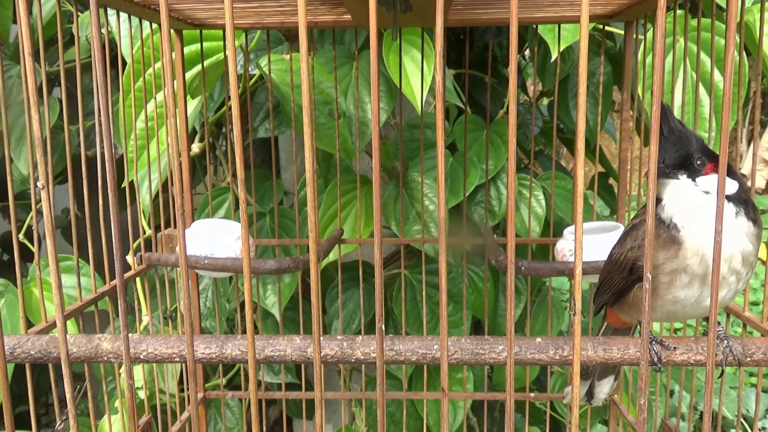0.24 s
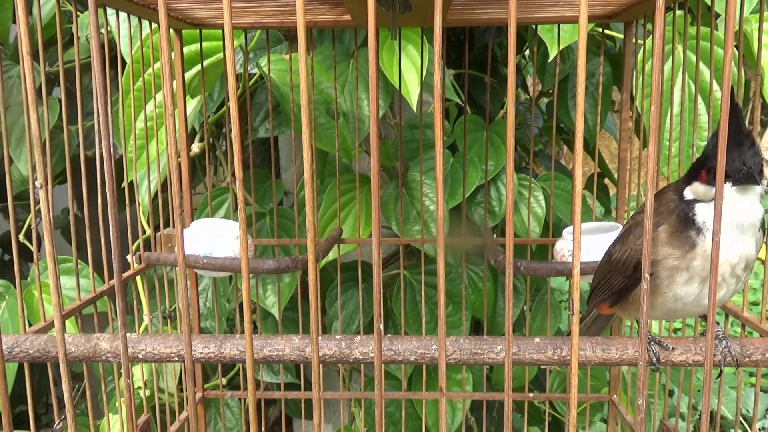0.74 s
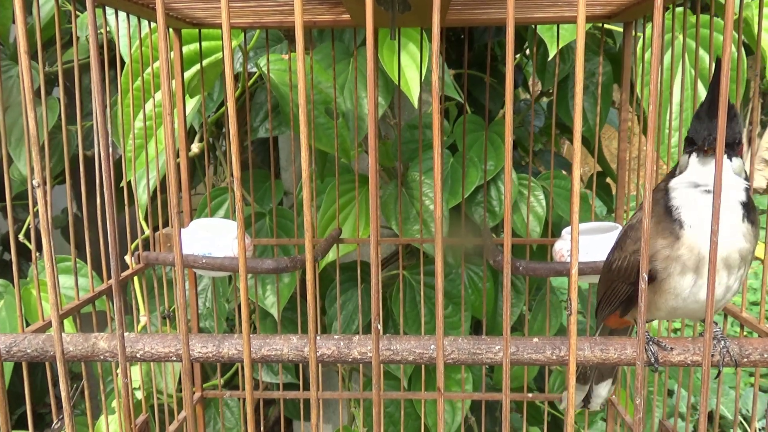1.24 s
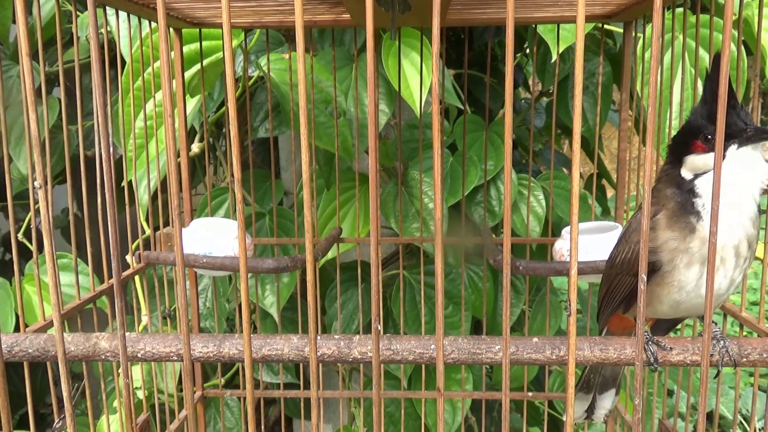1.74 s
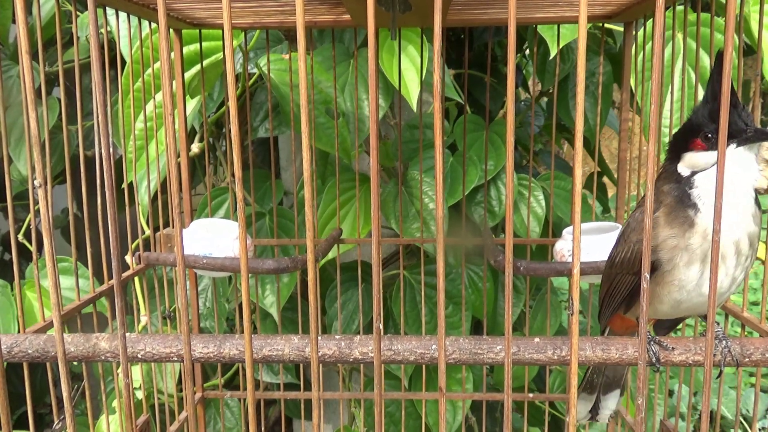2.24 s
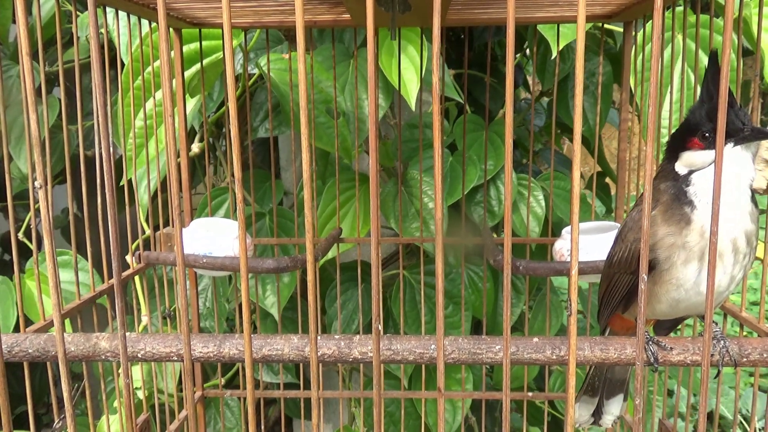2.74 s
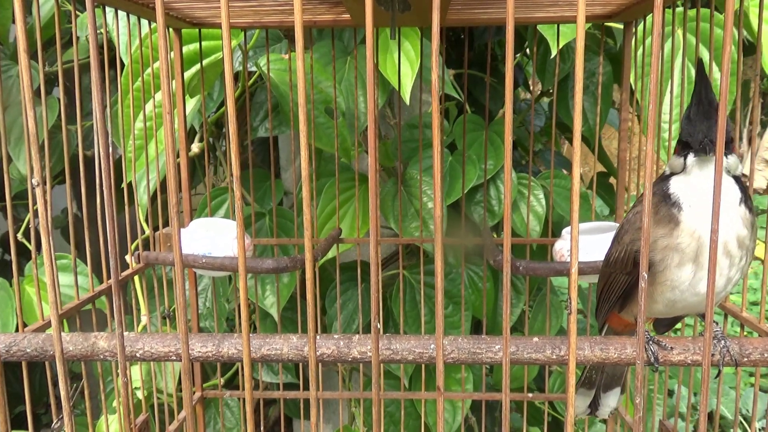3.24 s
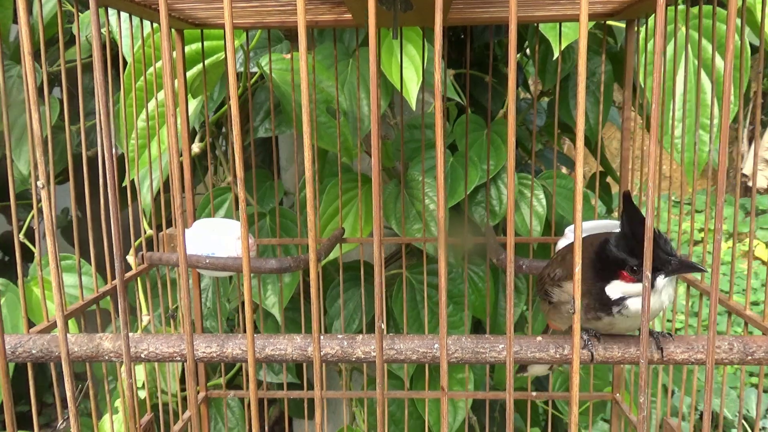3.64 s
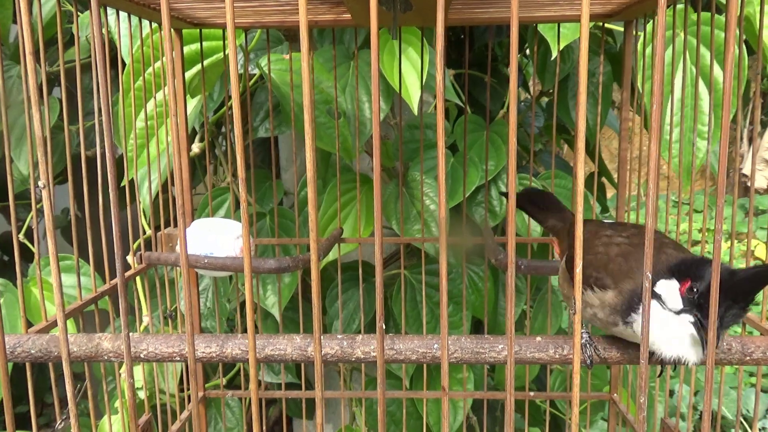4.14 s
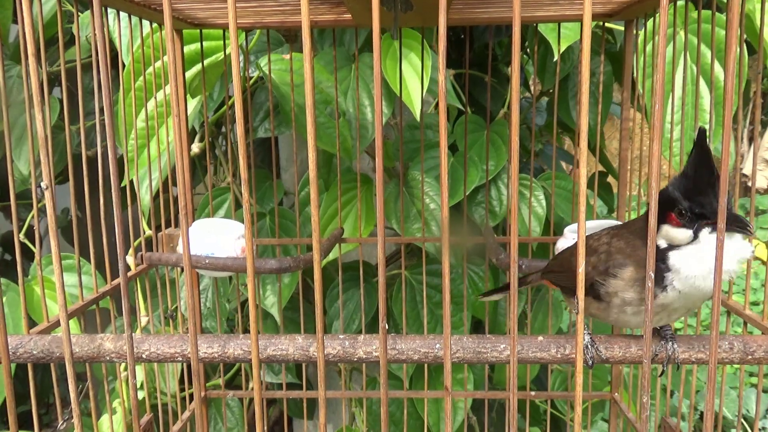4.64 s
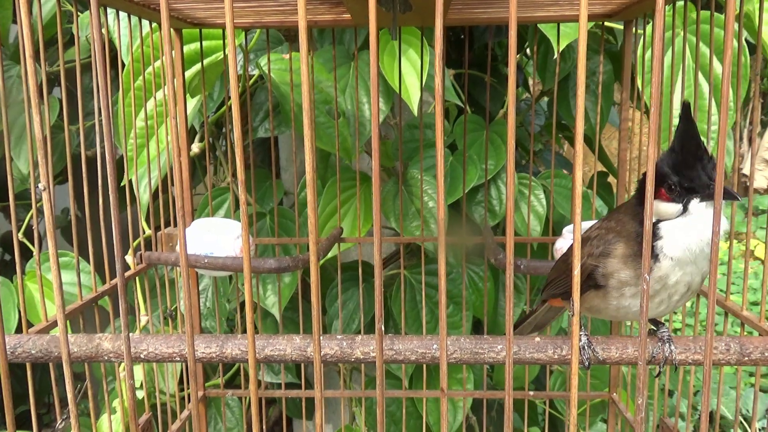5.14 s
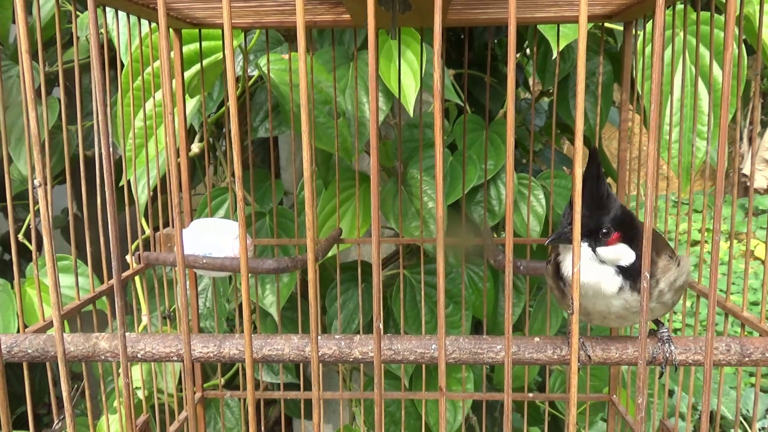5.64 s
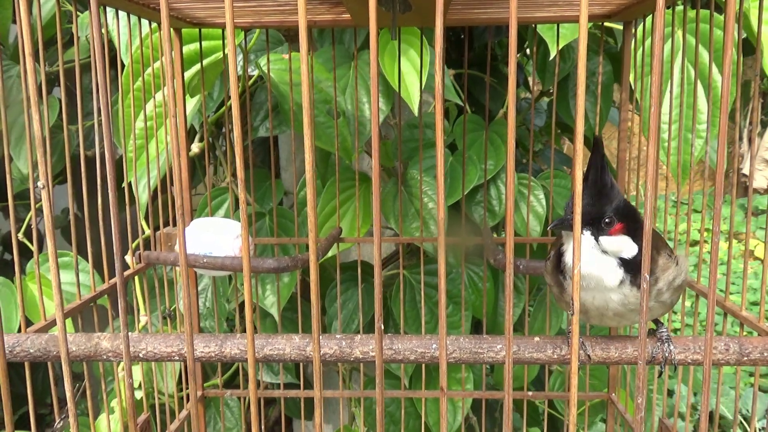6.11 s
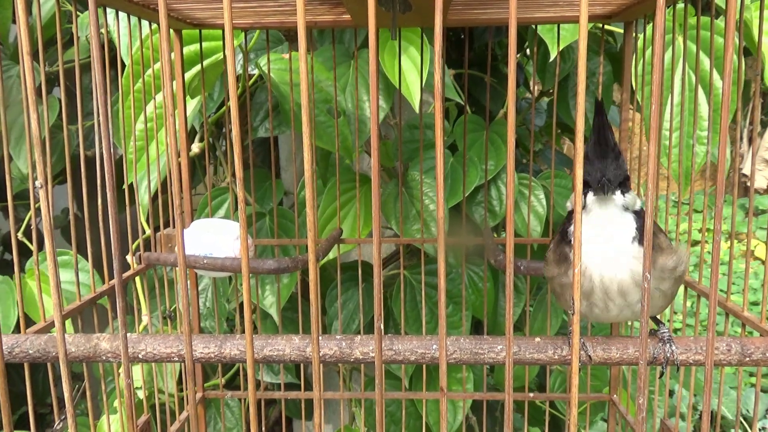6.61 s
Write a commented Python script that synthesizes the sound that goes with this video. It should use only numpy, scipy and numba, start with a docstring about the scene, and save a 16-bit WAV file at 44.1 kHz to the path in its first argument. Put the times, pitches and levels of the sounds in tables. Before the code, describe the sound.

A quiet leafy garden with steady soft hush and low breeze; small distant birds chirp in quick faint glides during the first half second. At about 1.05 s a close songbird, slightly right, whistles loudly: a fast trilling whoop rising from low to high, a brief gap, then from 1.27 to 1.77 s a tumbling run of low warble, upward leap, short chip, climbing whistle, low step, trill and falling close. It is fluty, nearly pure, a little hoarse at onsets, peaks squashed by overload, with a short airy echo. Quiet follows, with soft wind bumps around 2 and 3.1-3.5 s and a few faint chirps near 3.5 s, cut briefly at 3.63 s as the background lifts slightly. The phrase repeats from 4.2 to 4.9 s. Distant birds chatter from 5.2 to 6.05 s, blurred by echo, with one faint low peep near 6.2 s; breeze and hush continue to about 6.9 s.

```python
"""Caged songbird in a garden

A bird close to a camera whistles one phrase twice, loud enough to overload it: a frequency-modulated tone.
Distant birds and one faint hum are short glides with decaying-noise echoes; breeze and hush are spectrally
shaped noise. The camera's feedback gain sinks under the song and creeps back; limiter and converter flatten the
peaks. The camera is paused once between the phrases: its gain returns to full and the distant birds cut out
briefly."""
import sys
import numpy as np
from scipy import signal
from scipy.fft import rfft, irfft, next_fast_len
from scipy.io import wavfile
from scipy.ndimage import uniform_filter1d
from numba import njit

SR = 44100
rng = np.random.default_rng(int(sys.argv[2]) if len(sys.argv) > 2 else 0)


def bounce(signal):
    """Save signal as a 16-bit WAV file at the path given by the first command-line argument."""
    frames = np.transpose(np.atleast_2d(signal))
    limited = np.clip(frames, -1, 1)
    pcm = np.round(limited * 32767).astype(np.int16)
    wavfile.write(sys.argv[1], SR, pcm)


N = 302967
PAUSE_S = 3.633
TOP_HZ = 15700  # upper limit of the overtones and of the camera's band


def undb(db):
    """Decibel definition: amplitude ratio of a level in dB."""
    return 10 ** (np.asarray(db) / 20)


def level(x, db):
    """Energy normalisation: scales x to an rms level in dB."""
    return x * undb(db) / np.sqrt(np.mean(x ** 2))


def noise(spectrum, channels=1):
    """Spectral shaping: white noise filtered to a (Hz, relative dB) spectrum, with rms 1."""
    hz, db = np.transpose(spectrum)
    size = next_fast_len(N)
    bin_hz = np.arange(size // 2 + 1) * SR / size
    shape = undb(np.interp(np.log(bin_hz + 1), np.log(hz), db))
    white = rng.standard_normal((channels, size))
    return level(irfft(rfft(white) * shape, size)[:, :N], 0)


def walk(rate):
    """Low-pass random modulation: levels held 1 / rate s, averaged twice; spread near 1."""
    k = int(SR / rate)
    steps = np.repeat(rng.standard_normal(N // k + 1), k)
    return 1.3 * uniform_filter1d(uniform_filter1d(steps, k), k)[:N]


def echoes(x, tails, alike, low_hz, high_hz):
    """Diffuse scattering off bars, leaves and walls: decaying noise tails (delay s, t60 s, dB), band-limited."""
    t = np.arange(SR) / SR
    mid, side = rng.standard_normal((2, SR))
    # t60 is the time to fall by 60 dB, a factor of 1000
    decays = [level((t > late) * np.exp(-np.log(1000) * t / t60), db) for late, t60, db in tails]
    shape = sum(decays) / np.sqrt(SR)
    tail = shape * (mid + (1 - np.clip(alike, 0, 1)) * side * np.array([[1], [-1]]))
    band = signal.butter(2, [low_hz, high_hz], "band", fs=SR, output="sos")
    tail = signal.sosfilt(band, tail)
    return signal.fftconvolve(x[None], tail, axes=1)[:, :N]


# Distant sounds: calls of the distant birds and one faint hum near 940 Hz. Each row: start in seconds, end in
# seconds, # start pitch in Hz, end pitch in Hz, level in dB before panning, direct share (0-1), throb rate in
# Hz (a negative one # reverses the pitch swing).
FAR_SOUNDS = [(0.0, 0.028, 3410, 3780, -39, 0.4, 134), (0.106, 0.119, 1965, 2150, -31.5, 0.7, 4),
              (0.12, 0.164, 2237, 2530, -32.5, 1, -2.5), (0.157, 0.184, 2010, 1980, -37, 0.8, -2),
              (0.183, 0.197, 3500, 3560, -34, 0.5, 2), (0.182, 0.211, 2910, 3220, -31.5, 0.7, 92),
              (0.312, 0.358, 3132, 3050, -25, 1, 129), (0.43, 0.477, 2187, 2200, -34.5, 0.9, -1),
              (0.474, 0.536, 2120, 2036, -29.5, 1, 78.5), (2.482, 2.6, 1850, 1816, -49, 0.72, 2),
              (3.344, 3.38, 2230, 3310, -41.5, 0.46, 105), (3.491, 3.539, 2600, 2464, -36, 0.75, 53),
              (3.557, 3.585, 3935, 4320, -41.5, 0.92, -1), (3.576, 3.598, 2390, 2980, -30, 0.7, 116),
              (3.598, 3.65, 3180, 2750, -29, 0.86, 130), (4.083, 4.096, 1480, 1497, -37.5, 0.65, -2),
              (5.19, 5.249, 1985, 3490, -29.5, 0.6, 141), (5.486, 5.563, 1950, 2860, -33, 0.36, 53.5),
              (5.6, 5.66, 2340, 2226, -33.5, 0.83, 2), (5.651, 5.763, 3192, 3360, -30, 0.8, 41.5),
              (5.715, 5.834, 943, 926, -39, 0.6, 36), (5.762, 5.862, 2967, 2650, -23.5, 0.34, 93),
              (5.82, 5.926, 3290, 2877, -32, 0, 81), (5.877, 6.045, 2290, 1745, -34.5, 0.4, 91),
              (5.949, 6.001, 3080, 2630, -31, 1, 84.5), (6.192, 6.223, 1034, 1083, -41, 1, 0)]


def far_sounds(t):
    """Direct and diffuse sound: short glides with coupled amplitude and pitch modulation, a little to the left."""
    sung, direct = np.zeros(N), np.zeros(N)
    waver = 1 + .011 * walk(150)
    for start, end, from_hz, to_hz, db, share, throb_hz in FAR_SOUNDS:
        on = (t >= start) & (t < end)
        late = t[on] - start
        u = late / (end - start)
        swing = 1 + .018 * np.sin(2 * np.pi * throb_hz * late)
        hz = (from_hz + (to_hz - from_hz) * u) * waver[on] * swing
        phase = 2 * np.pi * np.cumsum(hz) / SR
        throb = np.abs(np.cos(np.pi * throb_hz * late))
        glide = undb(db) * np.sqrt(np.sin(np.pi * u)) * throb * np.sin(phase)
        sung[on] += glide
        direct[on] += share * glide
    wet = direct + echoes(sung, [(.004, .25, -1), (.03, .8, -4.5)], alike=0.83, low_hz=500, high_hz=6000)
    # the distant birds and their echoes are silent for 0.4 s after the pause
    gone = (t > PAUSE_S) & (t < PAUSE_S + .4)
    return wet * uniform_filter1d(1. - gone, size=90) * undb([[1.5], [-1.5]])


# Strength of the breeze on the microphone. Each row: time in seconds, level in dB before gusting and panning.
BREEZE_LEVELS = [(0, -40), (1.001, -44), (1.9, -41), (2.3, -43), (3.098, -40), (3.602, -43.5),
                 (4.901, -46.5), (5.499, -41), (6.001, -40), (6.402, -37.5), (6.87, -41)]
# Its strongest bumps. Each row: start in seconds, nominal level in dB, ringing frequency in Hz.
BUMPS = [(1.994, -26.5, 95), (3.111, -22, 136.6), (3.2, -26.5, 111), (3.222, -26, 140),
         (3.478, -23.5, 96.3), (3.906, -26, 108), (3.954, -28.5, 107), (4.093, -26.5, 156),
         (6.629, -27, 97.7)]
# Spectrum of the rumble. Each row: frequency in Hz, relative density in dB per Hz.
GUST_SPECTRUM = [(15, -47.5), (25, -6), (97, 0), (239, -7), (374, -7.5), (418, -14.5), (487, -10.5),
                 (700, -18.5), (910, -59), (1540, -120)]


def breeze(t):
    """Turbulent pressure: gusty low-frequency noise, with damped oscillations for soft bumps on the membrane."""
    s, db = np.transpose(BREEZE_LEVELS)
    gusts = undb(np.interp(t, s, db) + 2.0 * walk(15))
    mid, side = noise(GUST_SPECTRUM, channels=2) * gusts
    for s, db, hz in BUMPS:
        cycles = np.clip(t - s, 0, 1) * hz
        mid = mid + undb(db) * 3.8 * cycles * np.exp(-1.6 * cycles) * np.sin(2 * np.pi * cycles)
    return mid * undb([[.8], [-.8]]) + undb(-17) * side * np.array([[1], [-1]])


# Spectrum of the garden. Each row: frequency in Hz, relative density in dB per Hz.
HUSH_SPECTRUM = [(180, -20), (300, -5.5), (650, -10), (1000, -6.5), (1500, -10.5), (3500, -12), (4700, -15),
                 (6200, -8.5), (8000, -14.5), (11500, -16), (14000, -20.5), (16000, -29.5)]


def hush():
    """Superposed sources: leaves and distant traffic as near-steady noise, nearly the same on both sides."""
    mean_db = -41
    mid, side = noise(HUSH_SPECTRUM, channels=2) * undb(mean_db + .4 * walk(4))
    return mid + undb(-21) * side * np.array([[1], [-1]])


# Contours of the parts of the phrase: rising whoop, low warble, leap up, short chip, climbing whistle, low step,
# trill, falling close. Each row: time in seconds from the part's start before stretching, pitch in Hz before
# shifting, relative level in dB.
PARTS = [
    [(0, 1865, -18), (.008, 2206, -2), (.022, 2330, 1), (.036, 2830, 2), (.054, 3178, 3), (.086, 3463, 5.5),
     (.105, 3639, -1), (.112, 3580, -24.5)],
    [(0, 2600, -19), (.004, 2244, -1.5), (.008, 1796, 2), (.016, 2197, 0.5), (.024, 1812, 3.5),
     (.039, 1786, 1)],
    [(0, 1802, 4.5), (.004, 2591, 5), (.014, 2810, 6.5), (.025, 2877, 9.5), (.033, 2820, -8),
     (.049, 2833, -13), (.053, 2804, -35)],
    [(0, 2383, -20.5), (.004, 2280, 5.5), (.0105, 2112, 0.5), (.016, 2470, 1.5), (.023, 2296, 1),
     (.027, 2291, -21.5)],
    [(0, 2481, -8), (.008, 2594, 3.5), (.015, 2731, 8.5), (.021, 2581, 9), (.026, 2787, 7),
     (.047, 2872, 11.5), (.051, 3134, 9), (.061, 3290, 8), (.068, 3228, 9), (.074, 3007, -13.5)],
    [(0, 1738, -10), (.005, 1872, 5.5), (.025, 1960, 7), (.028, 2358, 8.5)],
    [(0, 2372, 9.5), (.011, 2313, 12.5), (.056, 2305, 11), (.064, 2070, 13)],
    [(0, 2098, 14), (.0065, 1842, 10), (.02, 1781, 9.5), (.037, 1557, 12.5), (.044, 1437, 4),
     (.048, 1200, -14), (.053, 899, -25)],
]
# The two phrases, one row per part. Each row: start in seconds, time stretch factor, pitch shift in semitones,
# level change in dB, swell in dB from start to end.
PHRASES = [
    [(1.045, 1.02, 0.17, -0.65, -0.6), (1.2745, 0.97, -0.064, -0.05, 0.4), (1.316, .95, -0.091, -1, 1.9),
     (1.401, 1.26, 0.034, 2, -10), (1.484, 0.98, -0.16, -0.2, -1.75), (1.619, 1.04, -0.11, -0.8, 1.8),
     (1.648, 0.87, 0.13, -2.9, 2.9), (1.709, 1.08, 0.31, 0.8, -2.3)],
    [(4.206, 0.96, -0.93, 1.6, -4.4), (4.413, 0.93, 0.25, 0.5, .3), (4.4495, 1.04, .3, 2.7, -4.5),
     (4.538, 0.92, 0.066, -2, 11.5), (4.612, 1.005, 0.25, 0.4, -0.8), (4.7515, 0.87, 0.18, 2.9, -3.3),
     (4.778, 1.05, -0.22, 0.5, 0.4), (4.847, 0.85, -0.26, 1.8, -3.6)],
]


def score(t):
    """Time-frequency contour: pitch in Hz and relative level in dB, each part at its time, tempo and pitch."""
    link_s = .002  # held into the next part
    hz, db = np.full(N, 2000.), np.full(N, -120.)
    for phrase in PHRASES:
        for (start, stretch, shift, level_db, swell_db), part in zip(phrase, PARTS):
            s, part_hz, part_db = np.transpose(part)
            part_db = part_db + level_db + swell_db * s / s[-1]
            s = start + stretch * s
            on = (t >= s[0]) & (t <= s[-1] + link_s)
            hz[on] = np.interp(t[on], s, part_hz * 2 ** (shift / 12))
            db[on] = np.interp(t[on], s, part_db)
    return hz, db


# Runs of throbs. Each row: first gap in seconds, last gap in seconds, number of throbs, slowing (0-1),
# depth in dB, pitch swing in Hz before tapering, lead of the swing in radians.
THROBS = [(1.0526, 1.138, 14, 0.14, 25.5, 253, 0.058), (1.673, 1.707, 3, 0.04, 24.5, 90, -1.3),
          (4.2112, 4.2931, 13, .13, 18, 327, -.8), (4.7824, 4.846, 6, 0.08, 15, 90.5, -0.71)]


def throb(t, size, hz):
    """Coupled modulation: periodic closing of the voice swings amplitude and pitch together, in place."""
    for first, last, throbs, slowing, depth_db, swing_hz, lead in THROBS:
        on = (t >= first - .01) & (t <= last + .01)
        u = (t[on] - first) / (last - first)
        turn = np.pi * round(throbs) * (u + slowing * u * (1 - u))
        # fully open before and after the run
        turn = np.clip(turn, -np.pi / 2, np.pi * (round(throbs) + .5))
        size[on] *= np.sqrt(np.sin(turn) ** 2 + undb(-2 * depth_db) * np.cos(turn) ** 2)
        taper = np.clip(np.minimum(u * 3.0 + 0.3, (1.2 - u) * 6), 0, 1)
        hz[on] += swing_hz * np.sin(2 * turn + lead) * taper


# Catches in the voice, one list per part. Each row: time in seconds from the part's start before stretching,
# depth in dB, width in milliseconds from the centre to 1/e.
CATCHES = [
    [(.004, 8, 1.2), (.097, 6, 1.1), (.1, 6, 1.1), (.106, 7, 1.2)],
    [(.0062, 14, 1.2), (.0109, 16, 1.4), (.025, 17, 2.8)],
    [(.001, 13, 1.9)],
    [(.0067, 17, 1.2), (.0123, 15, 1.2)],
    [(.0489, 6.5, 1.4), (.0552, 9.5, 1.2)],
    [(.0126, 6.5, 1.1), (.0263, 12, 2.1)],
    [(.0148, 5, 2.4)],
    [],
]


def catch(t, size, hz):
    """Momentary constriction: Gaussian dips in amplitude, with a sag in pitch as the voice closes, in place."""
    for phrase in PHRASES:
        for (start, stretch, *_), part in zip(phrase, CATCHES):
            for late, depth_db, ms in part:
                s = start + stretch * late
                on = slice(int((s - .01) * SR), int((s + .01) * SR))
                shut = (1 - undb(-depth_db)) * np.exp(-((t[on] - s) * 1000 / ms) ** 2)
                size[on] *= 1 - shut
                hz[on] *= 1 - 0.1 * shut


# How roughly each part sets in: initial flutter depth in dB, one value per part.
HOARSE_DB = [-12.5, -13.5, -28, -13, -24, -21, -20, -26]


def hoarse(t):
    """Random amplitude modulation: quick flutter, strongest at a part's onset, spreads a skirt around the pitch."""
    decay_s = .024
    depth = np.zeros(N)
    for phrase in PHRASES:
        for (start, *_), db in zip(phrase, HOARSE_DB):
            on = t >= start
            depth[on] = undb(db) * np.exp(-(t[on] - start) / decay_s)
    return 1 + depth * walk(2600)


# Levels in dB of multiples 2 to 8 of the pitch, before resonance and flicker.
OVERTONES_DB = [-35.5, -43.5, -53.5, -47.5, -41, -45.5, -65]
# Resonances that lift the overtones. Each row: centre in Hz, width in Hz from the centre to 1/e, lift in dB.
LIFTS = [(3500, 530, 13.5), (12400, 2900, 14)]


def overtones(hz, phase):
    """Harmonic series: weak multiples of the pitch, lifted by resonances, wavering in level and phase."""
    tone = np.zeros(N)
    for k, over_db in enumerate(OVERTONES_DB, start=2):
        lift = sum(db * np.exp(-((k * hz - centre) / width) ** 2) for centre, width, db in LIFTS)
        size = undb(over_db + lift + 2.4 * walk(250))
        tone += size * np.sin(k * phase + .045 * k * walk(350)) * (k * hz < TOP_HZ)
    return tone


# Spectrum of the leaking air. Each row: frequency in Hz, relative density in dB per Hz.
RASP_SPECTRUM = [(600, -23), (1500, -4.5), (4500, -3.5), (9500, -7.5), (11500, 8.5), (13500, -7),
                 (16000, -12.5)]


def rasp(hz):
    """Turbulent leakage: shaped noise beside the tone; low notes leak more air."""
    octaves = np.log2(hz / 2400)
    return noise(RASP_SPECTRUM)[0] * undb(-32.5 - 6 * octaves)


def songbird(t):
    """Frequency modulation: a near-pure whistle whose phase integrates its pitch, pinched by throbs and catches."""
    near_db = 3.5  # gained from the short distance
    hz, db = score(t)
    # the syrinx cannot start or stop at once
    size = uniform_filter1d(uniform_filter1d(undb(db), size=60), size=60)
    throb(t, size, hz)
    catch(t, size, hz)
    wavering_hz = uniform_filter1d(hz, size=20) * (1 + 0.0093 * walk(300))
    phase = 2 * np.pi * np.cumsum(wavering_hz) / SR
    tone = np.sin(phase) * hoarse(t) + overtones(hz, phase)
    return size * undb(near_db + 1.1 * walk(200)) * (tone + rasp(hz)), hz


# Faint flicks as the voice opens or shuts, one list per part. Each row: time in seconds from the part's start
# before stretching, start pitch in Hz, end pitch in Hz, level in dB before panning.
FLICKS = [
    [],
    [(-.009, 1500, 1800, -29)],
    [(.035, 2400, 850, -25)],
    [(-.011, 1100, 2000, -25), (.026, 2300, 850, -25)],
    [(-.011, 700, 1700, -29), (.072, 2500, 850, -19)],
    [],
    [],
    [],
]


def flicks(t):
    """Exponential glide: very short, weak sweeps as the voice opens or shuts."""
    flick_s = 0.0037
    out = np.zeros(N)
    for phrase in PHRASES:
        for (start, stretch, *_), part in zip(phrase, FLICKS):
            for late, from_hz, to_hz, db in part:
                s = start + stretch * late
                on = (t >= s) & (t < s + flick_s)
                u = (t[on] - s) / flick_s
                phase = 2 * np.pi * np.cumsum(from_hz * (to_hz / from_hz) ** u) / SR
                out[on] += undb(db) * np.sin(np.pi * u) * np.sin(phase)
    return out


def scene():
    """Superposition: direct song, its echoes, distant birds and a faint hum, breeze and hush add linearly."""
    t = np.arange(N) / SR
    song, hz = songbird(t)
    song = song + flicks(t)
    # the left side is weaker, so the song leans right, and low notes lean further
    left_db = -3.5 + 0.5 * np.log2(hz / 2400)
    yard = echoes(song, [(.008, .16, -16), (.02, .6, -25.5)], alike=0.88, low_hz=2600, high_hz=4400)
    # the overtones ring on briefly
    yard += echoes(song, [(.006, .22, -18.5)], alike=0.6, low_hz=6000, high_hz=14000)
    near = song * undb([left_db, 0 * left_db])
    return near + yard + far_sounds(t) + breeze(t) + hush()


@njit
def ride(loud, pause, top, fall_db, rise_db):
    """Feedback gain control in dB: sinks in step with the overshoot above top, creeps back, is full at the pause."""
    out, g = np.empty(len(loud)), 0.
    for i in range(len(loud)):
        over = loud[i] + g - top
        g = g - fall_db * over if over > 0 else min(g + rise_db, 0.)
        if i == pause:
            g = 0.
        out[i] = g
    return out


@njit
def peak(x, attack, release):
    """Envelope detection: follows the peaks, quick up and slower down."""
    out, e = np.empty(len(x)), 0.
    for i in range(len(x)):
        e += (x[i] - e) * (attack if x[i] > e else release)
        out[i] = e
    return out


def record(dry):
    """Dynamic compression: slow gain, a quick limiter shared by both sides, a flattening converter, a steep top."""
    power = uniform_filter1d(np.mean(dry ** 2, axis=0), size=441)  # over 10 ms
    loud_db = 10 * np.log10(power + 1e-9)
    # per second: falls 2.3 dB for each dB of overshoot, rises 4.2 dB
    gain_db = ride(loud_db, int(PAUSE_S * SR), -18.0, 2.3 / SR, 4.2 / SR)
    x = dry * undb(gain_db)
    attack_s, release_s = 0.00043, 0.0028
    held = peak(np.abs(x).max(axis=0), 1 / (attack_s * SR), 1 / (release_s * SR))
    x = x / np.maximum(held / 0.73, 1) ** 0.52
    knee = 36.0  # a high power bends only near full scale
    x = x / (1 + np.abs(x) ** knee) ** (1 / knee)
    steep_top = signal.ellip(8, .2, 60, TOP_HZ, fs=SR, output="sos")
    return np.clip(signal.sosfilt(steep_top, x), -1, 1)


dry = scene()
out = record(dry)
bounce(out)
```